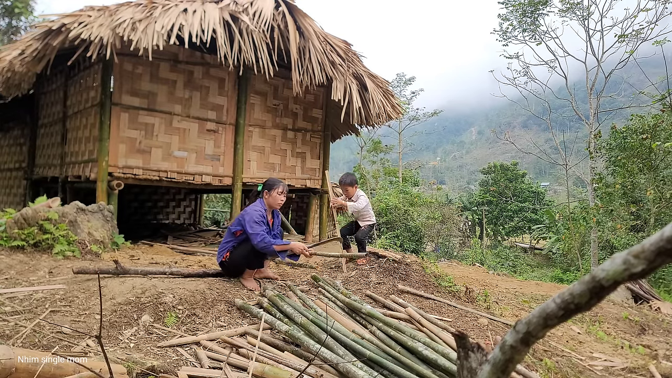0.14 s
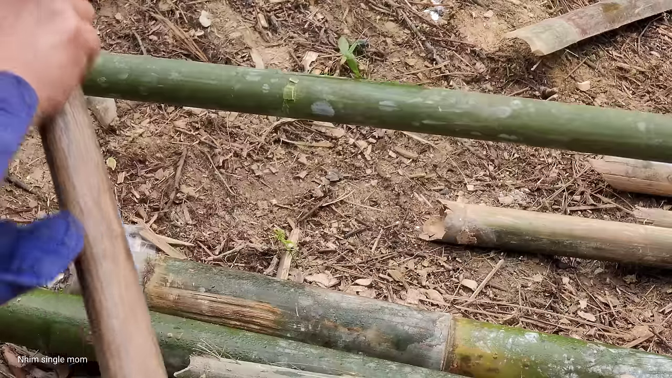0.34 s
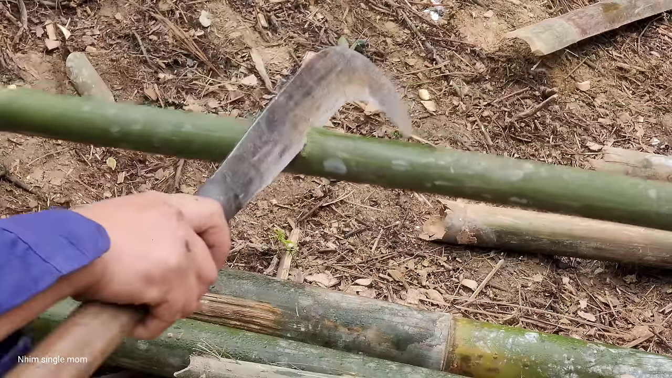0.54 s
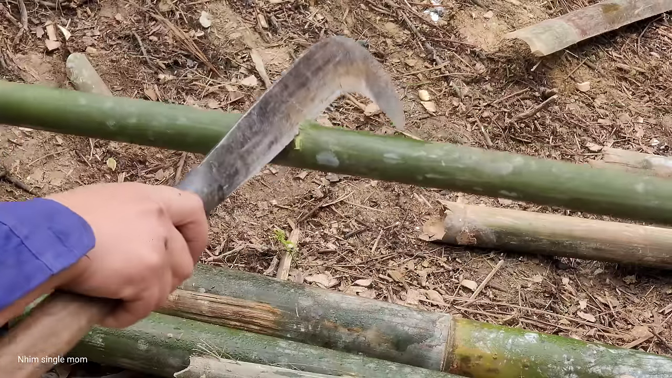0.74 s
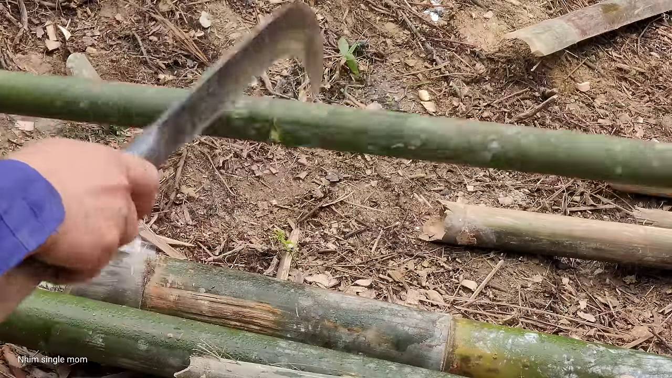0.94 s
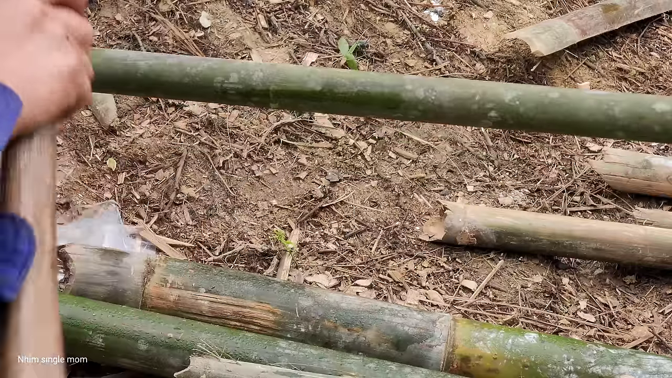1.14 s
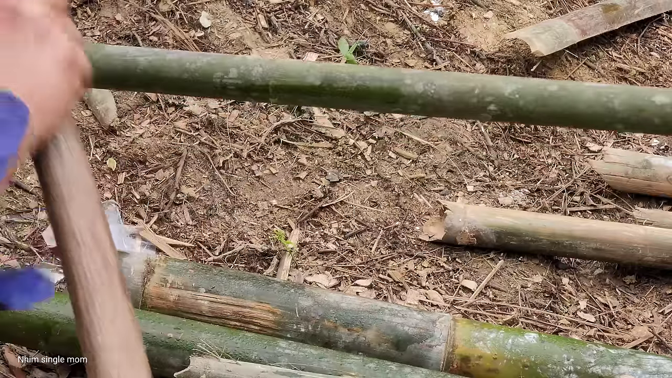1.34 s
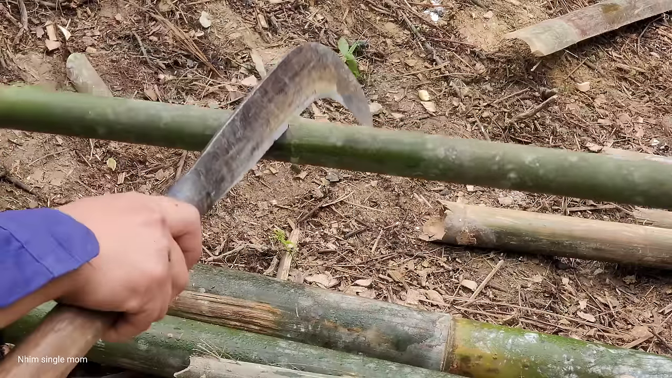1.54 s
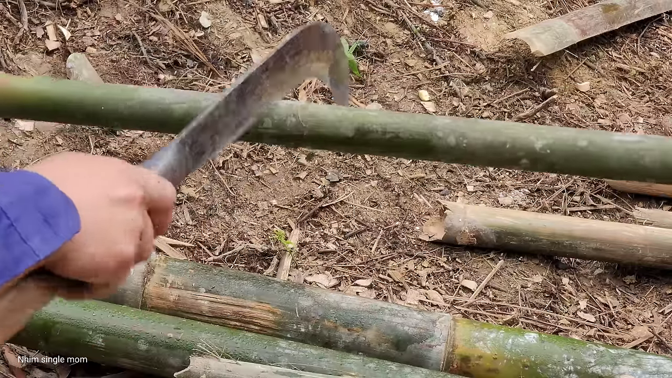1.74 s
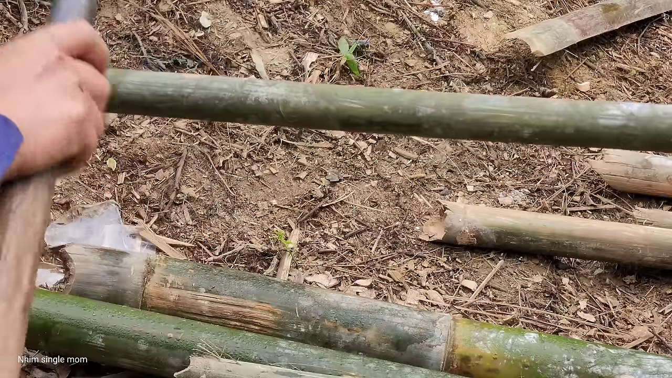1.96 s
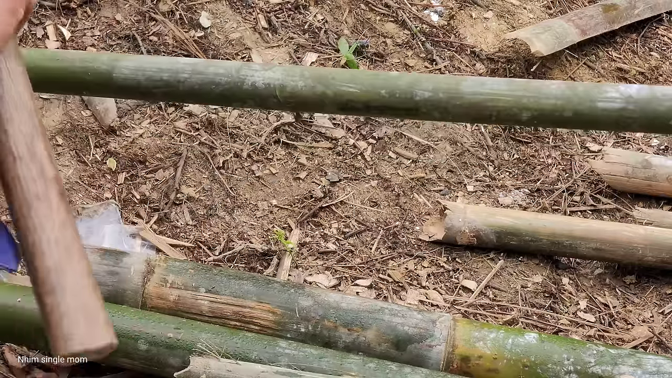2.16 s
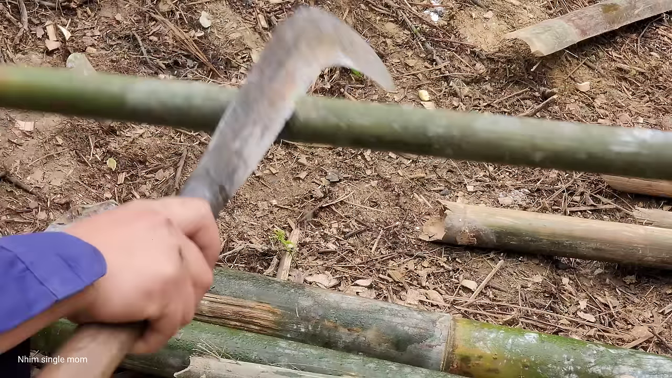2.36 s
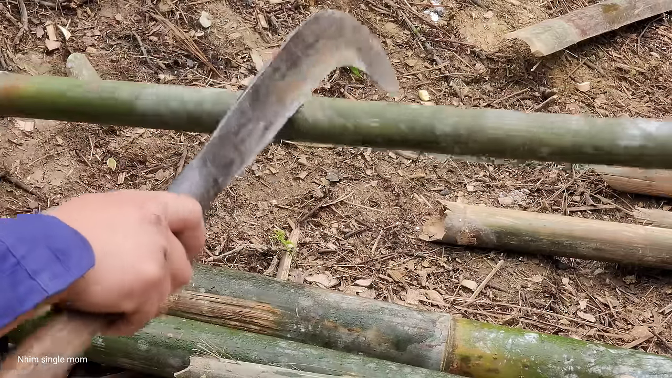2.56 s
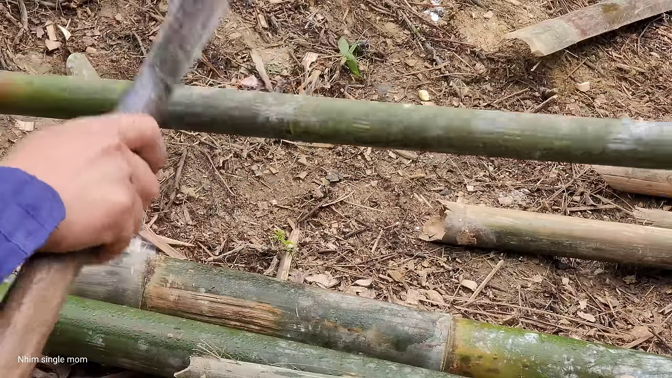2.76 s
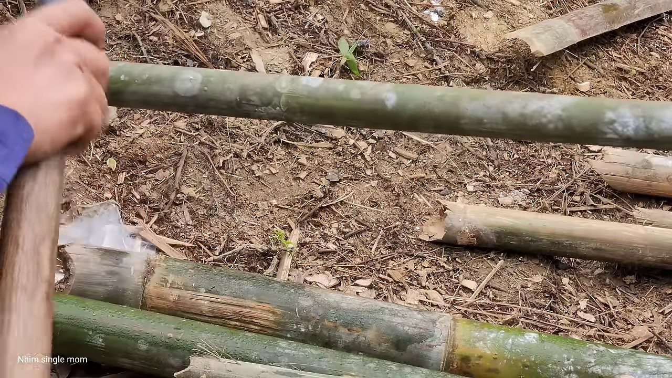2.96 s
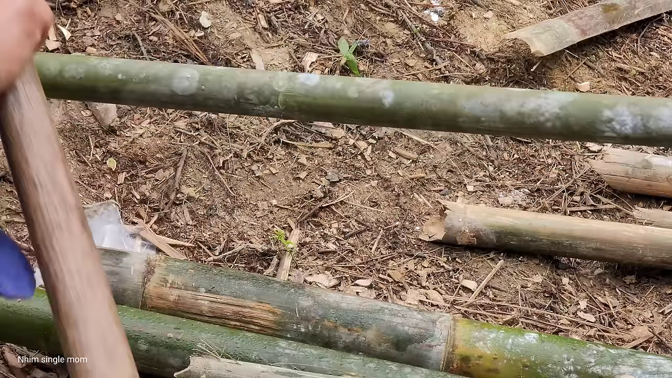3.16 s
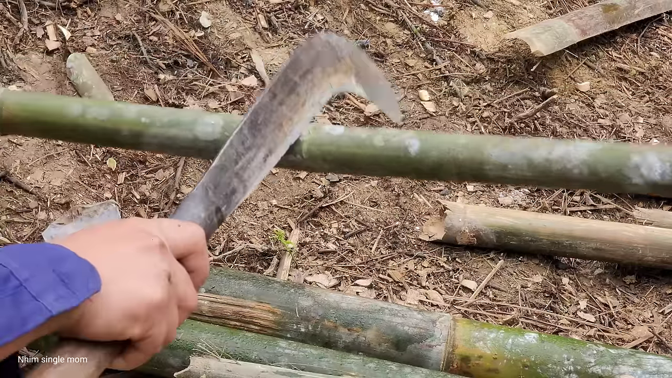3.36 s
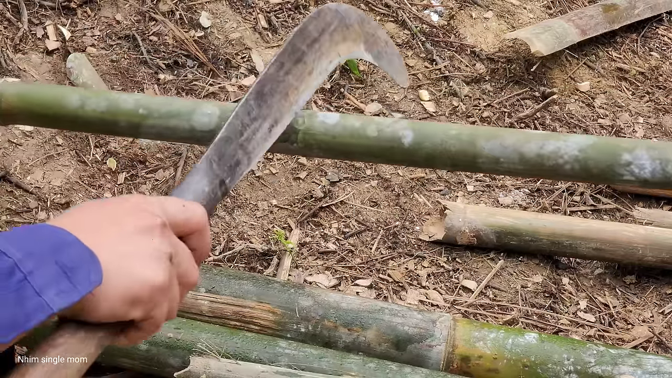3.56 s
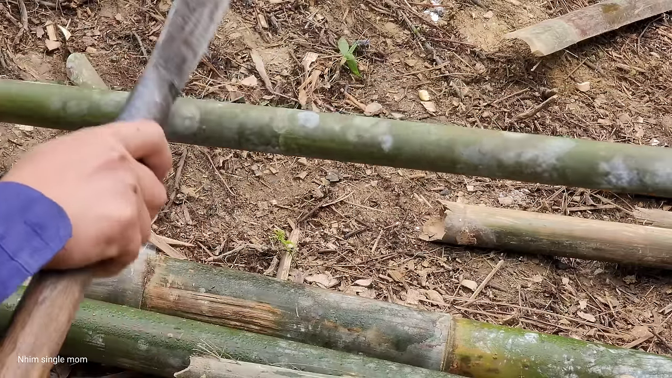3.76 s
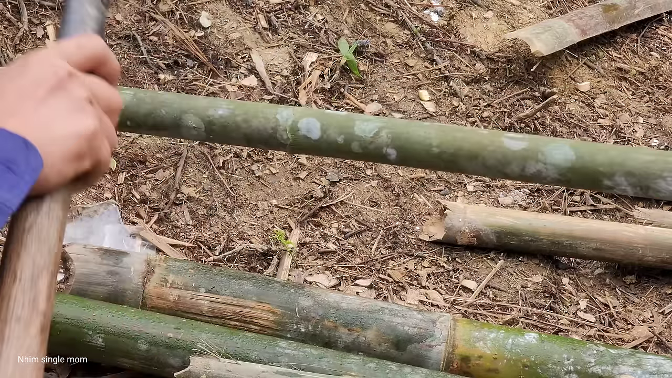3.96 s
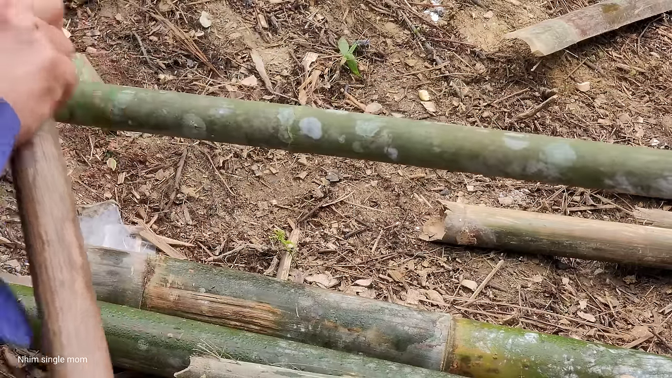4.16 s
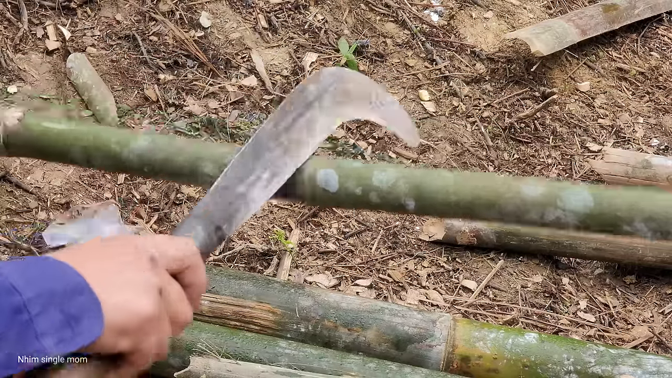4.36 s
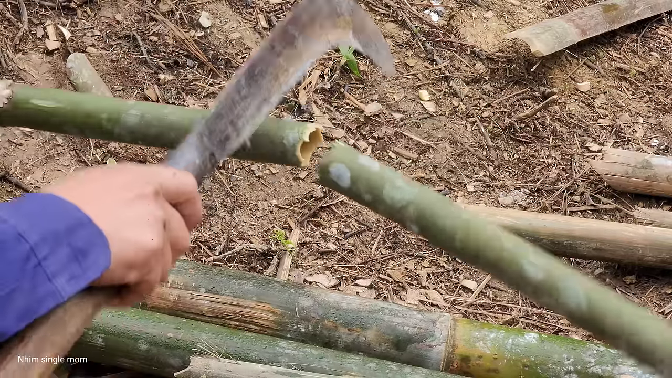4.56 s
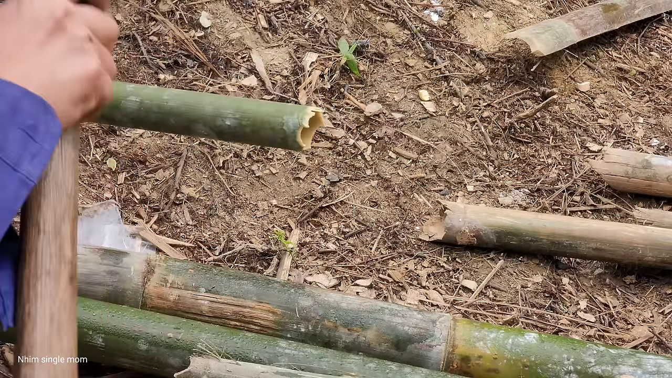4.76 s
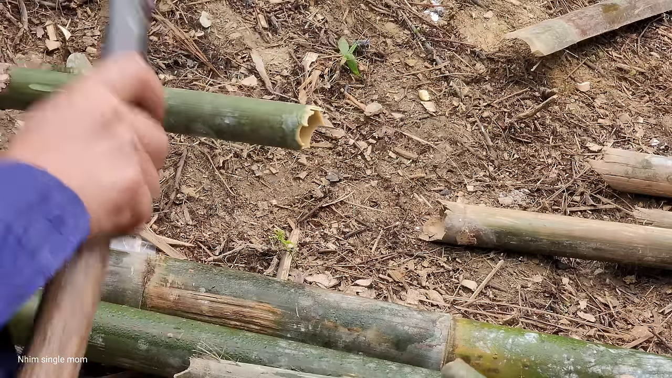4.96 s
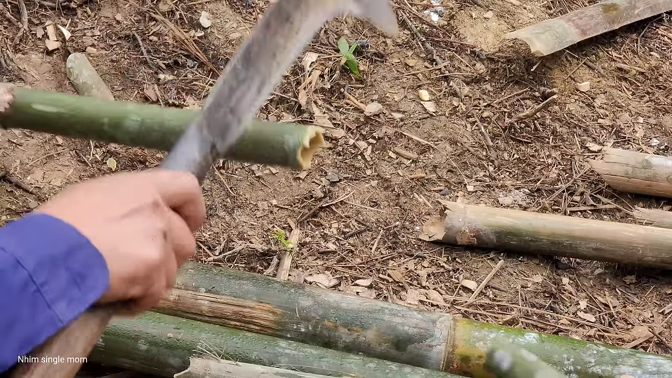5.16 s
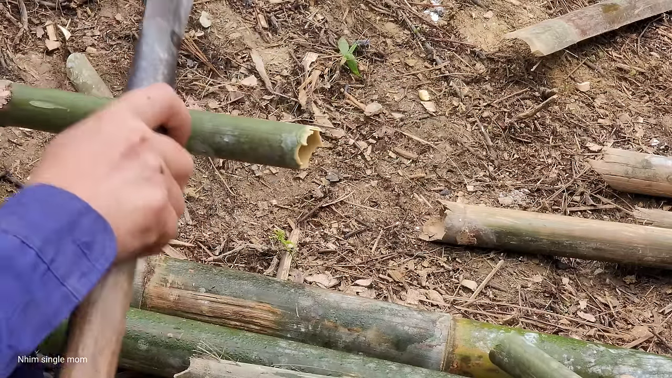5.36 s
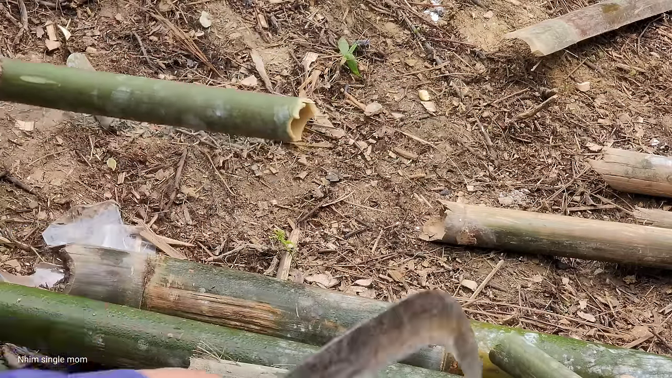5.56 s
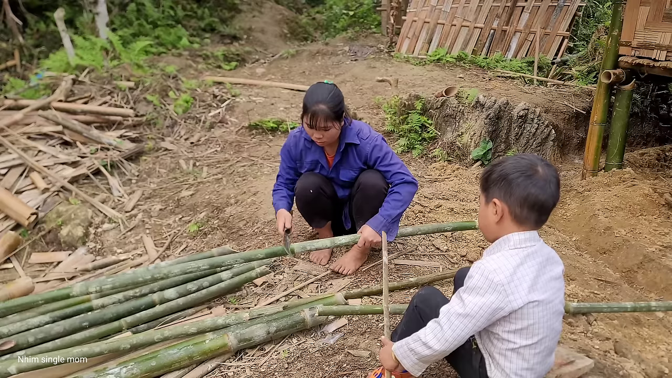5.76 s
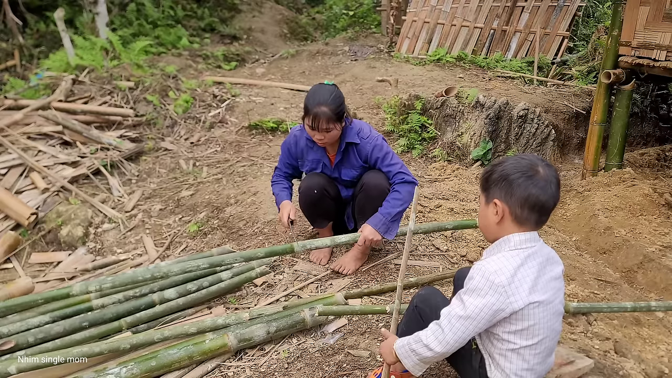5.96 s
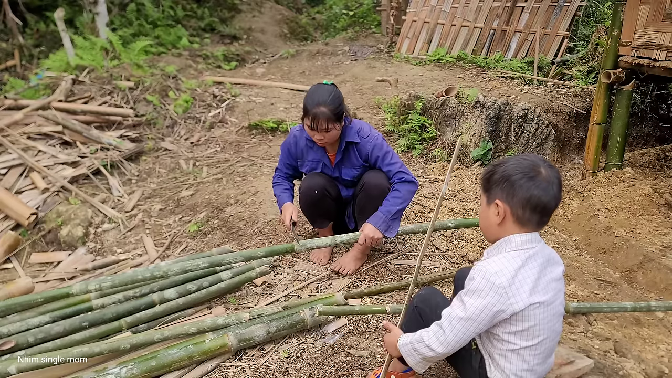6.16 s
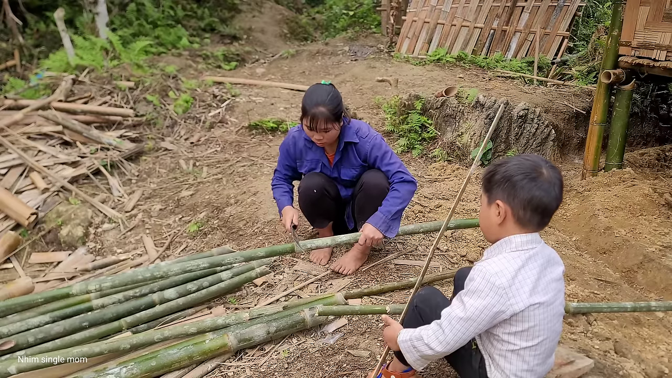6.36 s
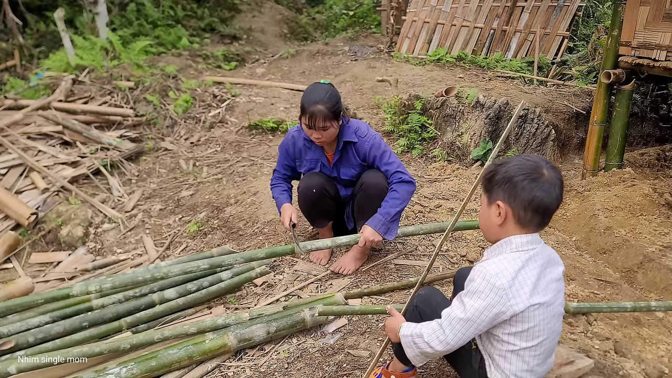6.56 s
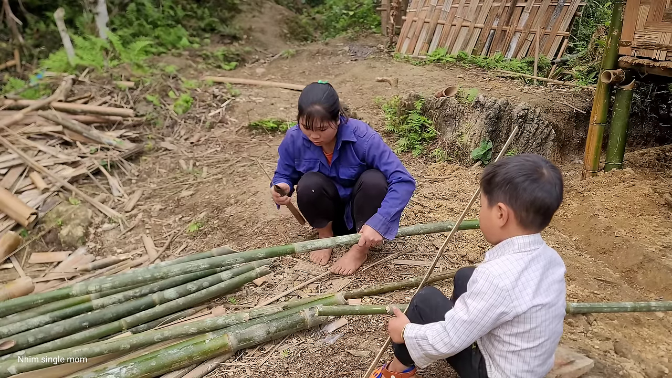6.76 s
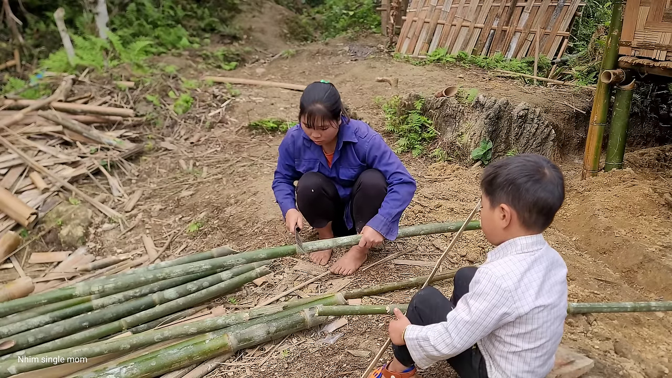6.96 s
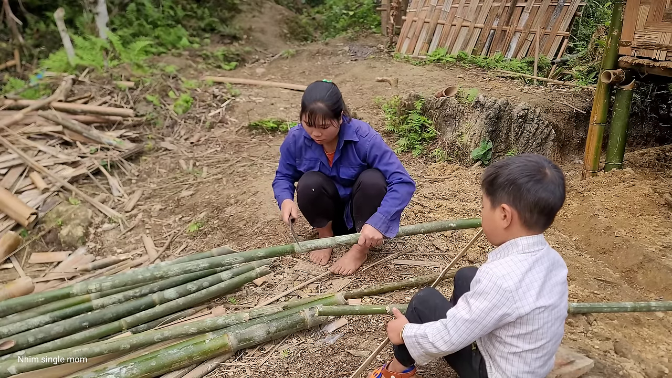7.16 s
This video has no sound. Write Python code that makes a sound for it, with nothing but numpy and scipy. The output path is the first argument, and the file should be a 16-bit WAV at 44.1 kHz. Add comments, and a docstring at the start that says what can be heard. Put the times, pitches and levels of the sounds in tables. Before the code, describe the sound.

A heavy hooked knife chops a hollow bamboo pole in sharp spaced blows, with splintering cracks, rattles and clattering pieces over a quiet rural hush.

```python
"""A hooked knife chops a green bamboo pole on dry litter, close to a phone; the pole bounces, rattles and snaps.
Each contact drives dense clicks through resonances of fibres, splinters, wall, tube and pole, plus one clean tap.
Behind: a hush of coloured noise with faint tones and hiss, a far rooster of two wavering partials,
small birds as gliding whistles and an insect as throbbing noise.
For the last part the phone stands further off, on the other side."""
import sys
import numpy as np
from scipy import signal
from scipy.fft import rfft, irfft
from scipy.io import wavfile
from scipy.ndimage import uniform_filter1d

SR = 44100
rng = np.random.default_rng(int(sys.argv[2]) if len(sys.argv) > 2 else 0)


def master(y):
    """Save y as 16-bit WAV."""
    cut = np.clip(np.atleast_2d(y).T, -1, 1)
    pcm = np.round(cut * 32767)  # scale
    wavfile.write(sys.argv[1], SR, pcm.astype(np.int16))


N = 317961
TIME = np.arange(N) / SR
CLOSE_UNTIL_S = 5.72


def undb(db):
    """dB to gain."""
    return 10 ** (np.asarray(db) / 20)


def unit(x):
    """Scale to rms 1."""
    return x / np.sqrt(np.mean(x ** 2))


def walk(rate_hz):
    """Random levels held 1 / rate_hz and slewed twice; spread near 1."""
    hold = int(SR / rate_hz)
    steps = np.repeat(rng.standard_normal(N // hold + 1), hold)
    slewed = uniform_filter1d(uniform_filter1d(steps, hold), hold)
    return 1.1 * slewed[:N]


def ring(x, modes):
    """Sum of resonances with alternating signs; modes as (frequency [Hz], width [Hz], level [dB])."""
    total = 0
    for k, (hz, width_hz, db) in enumerate(modes):
        b, a = signal.iirpeak(hz, hz / width_hz, SR)
        total = total + (-1) ** k * undb(db) * signal.lfilter(b, a, x)
    return total


def tones(modes, flicker_db):
    """Narrow noisy tones: stereo noise through each resonance twice, each swelling on its own."""
    total = 0
    for hz, width_hz, db in modes:
        resonance = [(hz, width_hz, 0)]
        level = undb(db + flicker_db * walk(35))
        noise = rng.standard_normal((2, N))
        total = total + level * unit(ring(ring(noise, resonance), resonance))
    return total


def coloured(spectrum):
    """Stereo noise of a given spectrum, rms 1; most alike in the bass, unrelated above."""
    hz = np.maximum(np.fft.rfftfreq(N, 1 / SR), 1)
    mid, side = rfft(rng.standard_normal((2, N)))
    points_hz, points_db = np.transpose(spectrum)
    apart = np.clip(hz / 210.0, .35, 1)
    gain = undb(np.interp(np.log(hz), np.log(points_hz), points_db))
    return unit(irfft(gain * np.array([mid + apart * side, mid - apart * side]), N))


# hush level: (time [s], level [dB])
HUSH_LEVEL = [(0, -48), (.2, -67.5), (.33, -70), (.5, -55.5), (1.2, -59), (5.5, -60.5), (5.75, -62.5),
              (6.5, -63), (7.21, -60)]
# hush spectra at the near and far place: (frequency [Hz], relative density [dB per Hz])
HUSH_SPECTRUM_CLOSE = [(15, -47.5), (25, -29.5), (64, -2), (87, -20.5), (145, -10), (277, -5), (354, -15),
                       (641, -12), (911, -16.5), (1260, -17.5), (4250, -23.5), (4740, -26), (5880, -34),
                       (16000, -69)]
HUSH_SPECTRUM_FAR = [(15, -41.5), (25, -4.5), (55, -1.5), (92, -13), (137, -3), (293, -9), (476, -14.5),
                     (624, -24), (936, -13), (1940, -26), (4490, -23.5), (5730, -32.5), (14800, -72),
                     (16000, -45.5)]
# wavering far tones on the close side: (frequency [Hz], width [Hz], level [dB])
DRONE_TONES = [(273, 21, -67.5), (1200, 360, -67), (1040, 140, -69), (6700, 1000, -86.5)]
# insect tones at the far place: (frequency [Hz], width [Hz], level [dB])
FAR_INSECT_TONES = [(4600, 300, -75), (3900, 350, -79.5), (980, 71, -83), (6400, 840, -93)]
FAR_INSECTS_FROM_S = 6.15
# faint treble hiss: (time [s], level [dB])
HISS_LEVEL = [(0, -82.5), (3.2, -85), (4.4, -78), (5.6, -79), (6.25, -75.5), (6.4, -80.5), (7.21, -77.5)]


def hush():
    """Air, leaves and the far valley as noise and narrow tones; the colour changes with the place of the phone."""
    close = TIME < CLOSE_UNTIL_S
    bed = np.where(close, coloured(HUSH_SPECTRUM_CLOSE), coloured(HUSH_SPECTRUM_FAR))
    bed = bed * undb(np.interp(TIME, *np.transpose(HUSH_LEVEL)) + 0.49 * walk(7.2))
    drone_fade = close * np.clip((TIME - .3) / .3, 0, 1)
    drone = drone_fade * tones(DRONE_TONES, 1.5)
    insect_fade = np.clip((TIME - FAR_INSECTS_FROM_S) / 0.13, 0, 1)
    insects = insect_fade * tones(FAR_INSECT_TONES, 0.92) * undb([[-2.5], [2.5]])
    highpass = signal.butter(6, 10200, "high", fs=SR, output="sos")
    hiss = signal.sosfilt(highpass, rng.standard_normal((2, N)))
    hiss_gain = undb(np.interp(TIME, *np.transpose(HISS_LEVEL)) + 2.5 * walk(12))
    return bed + drone + insects + hiss_gain * hiss


# far rooster: (time [s], pitch [Hz], level [dB], second partial re first [dB])
CROW_CONTOUR = [(.36, 607, -100, 15), (.42, 630, -71, 11), (.5, 627, -81, 6), (1.102, 638, -66, 1.5),
                (1.462, 644, -68.5, -9), (1.929, 599.5, -67.5, 5), (2.099, 567.4, -62.5, -11),
                (2.2, 505, -63, -6), (2.4, 486, -66.5, -5), (2.46, 506, -100, -2)]


def rooster():
    """A hoarse crow: two partials of one unsteady pitch, wavering on their way across the slope."""
    s, *contours = np.transpose(CROW_CONTOUR)
    hz, db, second_db = (np.interp(TIME, s, contour) for contour in contours)
    phase = 2 * np.pi * np.cumsum(hz * (1 + 0.02 * walk(43))) / SR
    # separate fading per partial and port
    first, second = (undb(1.3 * np.array([walk(20), walk(11)])) for _ in range(2))
    voice = first * np.sin(phase) + second * undb(second_db) * np.sin(2 * phase)
    crowing = (TIME >= s[0]) & (TIME <= s[-1])
    return undb(db) * voice * crowing


# small birds and far fowl:
# (time [s], length [s], start pitch [Hz], pitch approached [Hz], starting level [dB], left minus right [dB])
BIRD_CALLS = [(1.285, 0.064, 6940, 7140, -61, -15), (1.307, 0.11, 1040, 1020, -69.5, -1),
              (1.941, 0.17, 1242, 1200, -69.5, 9.5), (2.128, 0.035, 6300, 7220, -68, -25.5),
              (2.286, 0.043, 6080, 6700, -66, -13), (2.906, 0.069, 1290, 1286, -66, -13),
              (3.015, .05, 1140, 980, -70, -4.5), (3.002, 0.063, 1290, 1230, -60, 9.5),
              (3.01, 0.038, 4050, 3280, -69, -4), (3.042, .035, 2830, 2450, -61, 0),
              (3.093, 0.056, 2700, 2300, -65, 2), (3.051, 0.067, 1060, 1280, -57, -7),
              (3.235, .06, 2640, 2640, -75, -5.5), (3.249, 0.035, 2580, 2080, -61, -7),
              (3.275, .06, 2140, 2750, -63, -5), (3.225, 0.069, 3750, 4040, -68, -5),
              (3.282, .05, 3850, 3680, -73, -3), (3.774, 0.1, 6700, 6870, -69, -15),
              (4.082, 0.15, 5000, 4600, -58, -5), (5.857, 0.068, 6330, 6450, -59, -12)]
GLIDE_SHARE = 0.26  # glide time constant / call length


def birds():
    """Whistles and clucks with exponential pitch glides, scattered back by many trees as decaying noise."""
    out = np.zeros((2, N))
    ragged = undb(2.5 * walk(90))
    for s, length_s, start_hz, end_hz, db, pan_db in BIRD_CALLS:
        t = np.maximum(TIME - s, 0)
        glide_s = GLIDE_SHARE * length_s
        glide_cycles = (start_hz - end_hz) * glide_s * (1 - np.exp(-t / glide_s))
        phase = 2 * np.pi * (end_hz * t + glide_cycles)
        fades = np.clip(t / .012, 0, 1) * np.clip((length_s - t) / .012, 0, 1)
        shape = fades * undb(-14 * t / length_s) * ragged
        out += undb(db + np.array([[pan_db], [-pan_db]]) / 2) * shape * np.sin(phase)
    trees = rng.standard_normal((2, SR)) * undb(-41 - 60 * TIME[:SR] / .7)
    return out + signal.fftconvolve(out, trees, axes=1)[:, :N]


# insect trills: (time [s], length [s], level of the first throb [dB])
TRILLS = [(6.4, .21, -72), (6.893, .05, -68.5)]
# insect body: (frequency [Hz], width [Hz], level [dB])
INSECT_BODY = [(2990, 110, 6.5), (2700, 190, -2)]
THROB_HZ, THROB_GROWTH_DB = 25.2, 1.5


def insect():
    """Short rasping throbs of noise through a small resonant body, off to the right; each trill grows."""
    gate = np.zeros(N)
    for s, length_s, db in TRILLS:
        for k in range(int(length_s * THROB_HZ) + 1):
            centre_s = s + .008 + k / THROB_HZ
            gate += undb(db + THROB_GROWTH_DB * k) * np.exp(-((TIME - centre_s) / 0.012) ** 2)
    rasp = unit(ring(rng.standard_normal(N), INSECT_BODY))
    return gate * rasp * undb([[-3], [3]])


# knife blows, and the pole or cut piece landing on the ground and other poles:
# (time [s], fibre tearing [dB], hollow knock [dB], tearing t60 [ms], tap [dB], thud [dB], knock t60 [ms])
KNIFE_BLOWS = [(0.0359, -36.5, -35, 220, -25.5, -42.5, 230), (0.5107, -23, -28.5, 450, -16.5, -38, 280),
               (1.4845, -24.5, -26, 264, -17.5, -22.5, 43), (2.4011, -23.5, -33.5, 223, -19.5, -37, 280),
               (3.3654, -22, -28, 210, -25, -34.5, 210), (4.3529, -25.5, -27, 247, -30, -35, 146),
               (6.2685, -48, -45.5, 90, -34, -45.5, 136), (6.9714, -28, -27.5, 170, -18, -34.5, 200)]
LANDINGS = [(.72, -35.5, -32.5, 180, -25, -42.5, 210), (.901, -39.5, -37, 270, -29, -48, 270),
            (1.667, -40.5, -35.5, 350, -27.5, -47.5, 190), (2.13, -78, -72, 100, -49, -54, 360),
            (2.565, -37.5, -36, 180, -29, -45, 120), (2.7238, -63.5, -51, 310, -42, -55, 140),
            (3.559, -48, -43.5, 210, -44, -44, 170), (3.72, -65.5, -57, 830, -55, -52.5, 81),
            (4.702, -22.5, -23, 138, -20, -47, 127), (4.798, -22.5, -30.5, 177, -24, -36, 160),
            (5.1091, -29.5, -35, 43, -29, -41, 203), (5.2293, -51.5, -43.5, 210, -28, -44.5, 290),
            (5.5373, -46.5, -67, 99, -55.5, -52.5, 260)]
# single fibres giving way:
# (time [s], fibre tearing [dB], hollow knock [dB], tearing t60 [ms], fizz over fibres [dB])
FIBRE_CRACKS = [(0.055, -33, -46.5, 124, 3), (.144, -54, -72, 40, 12.5), (0.5882, -21, -40.5, 81, -3),
                (0.629, -31.5, -38, 56, 0), (0.6904, -32, -45, 82, -3), (0.9426, -33, -39, 48, 0.5),
                (1.1876, -64, -79, 40, 1), (1.494, -23.5, -26, 33, 6), (1.544, -22.5, -33, 64, 3.5),
                (1.641, -38.5, -63, 30, 5.5), (1.7073, -35.5, -42, 59, 4), (1.7714, -39.5, -44.5, 76, 4.5),
                (2.4093, -25.5, -28, 35, 4), (2.442, -31, -35, 35, 4), (2.4596, -25.5, -41, 69, 1),
                (2.6, -39, -37, 93, -0.5), (3.408, -24.5, -32, 110, 0), (3.481, -35.5, -51, 55, 4.5),
                (3.7378, -53, -51.5, 17, 4.5), (4.3614, -27, -26, 44, -2), (4.397, -28.5, -45, 43, 3),
                (4.746, -31, -37, 29, 7), (5.016, -49, -55, 42, 7), (5.176, -52, -55, 25, -5),
                (5.0435, -52, -56, 21, 0), (5.55, -53.5, -49.5, 26, 18.5), (6.0137, -63.5, -87, 37, 0),
                (6.8048, -67, -84, 45, 2.5), (7.033, -36, -48, 44, -17), (7.056, -37, -53, 41, 3)]
# loose pole shaking against blade and litter:
# (time [s], fibre tearing [dB], hollow knock [dB], tearing t60 [ms], thud [dB])
POLE_RATTLES = [(0.102, -43, -46, 130, -70), (0.529, -20, -25.5, 93, -54.5), (0.566, -24, -35.5, 150, -46),
                (0.647, -44, -40, 150, -58), (0.752, -38, -41, 110, -51), (0.8517, -54, -54, 120, -64),
                (1.0736, -63.5, -57, 200, -67), (1.597, -36, -37.5, 170, -50), (1.834, -56.5, -54, 65, -57),
                (2.428, -34.5, -28.5, 260, -55), (2.514, -43, -38.5, 260, -50),
                (2.746, -64, -50, 340, -55.5), (3.444, -35, -33.5, 190, -46), (3.5754, -39, -41.5, 87, -60),
                (3.6435, -60, -58, 280, -61.5), (4.392, -30, -32, 216, -46.5),
                (4.462, -37, -36, 160, -46.5), (4.493, -37, -35, 200, -46), (4.552, -61.5, -60, 1900, -64),
                (4.733, -30.5, -33, 370, -46), (4.8297, -33, -30.5, 175, -39),
                (4.886, -39.5, -40, 180, -48), (4.9597, -48, -50, 330, -53), (4.983, -40, -41.5, 110, -50),
                (5.1264, -42.5, -34.5, 92, -58), (5.295, -57, -49.5, 380, -52.5),
                (5.356, -61, -52.5, 79, -58), (5.5865, -76, -54, 380, -54), (6.999, -40.5, -47, 540, -37.5)]
# traits per kind: (rise [ms], snap over fibres [dB], jolt over thud [dB])
CHOP = (4.2, 7.4, -11)
BOUNCE = (3.9, 4, -15)
CRACK = (5.5, -2.5, -14.5)
RATTLE = (5.5, -9, -19.5)
CHOP_FIZZ_DB, BOUNCE_FIZZ_DB, RATTLE_FIZZ_DB = -4, -1, 1  # over the fibres
CRACK_TAP_DB, CRACK_THUD_DB, RATTLE_TAP_DB = 2, -14.5, -7  # over the knock
CRACK_KNOCK_T60_MS, RATTLE_KNOCK_T60_MS = 110, 190


def contacts():
    """All contacts as columns, each row filled up with the traits of its kind."""
    rows = [row + (CHOP_FIZZ_DB,) + CHOP for row in KNIFE_BLOWS]
    rows += [row + (BOUNCE_FIZZ_DB,) + BOUNCE for row in LANDINGS]
    for s, fibre_db, knock_db, t60_ms, fizz_db in FIBRE_CRACKS:
        tap_db, thud_db = knock_db + CRACK_TAP_DB, knock_db + CRACK_THUD_DB
        rows.append((s, fibre_db, knock_db, t60_ms, tap_db, thud_db, CRACK_KNOCK_T60_MS, fizz_db) + CRACK)
    for s, fibre_db, knock_db, t60_ms, thud_db in POLE_RATTLES:
        tap_db = knock_db + RATTLE_TAP_DB
        rows.append((s, fibre_db, knock_db, t60_ms, tap_db, thud_db, RATTLE_KNOCK_T60_MS, RATTLE_FIZZ_DB)
                    + RATTLE)
    return np.transpose(rows)


FAR_RISE_SHARE = .12


def rises(s, rise_ms):
    """Rise times as heard from either place; further off the contacts start more abruptly."""
    return rise_ms * np.where(s < CLOSE_UNTIL_S, 1, FAR_RISE_SHARE)


LAG_CLOSE_SAMPLES, LAG_FAR_SAMPLES = 9, -20  # left port behind right, at full share


def to_ports(x, share):
    """Left port: later when close, earlier when far; long waves bend round the phone and lag less."""
    close = np.roll(x, int(share * LAG_CLOSE_SAMPLES))
    far = np.roll(x, int(share * LAG_FAR_SAMPLES))
    return np.where(TIME < CLOSE_UNTIL_S, close, far)


# modes of air column, bending pole, hard outer wall, fibres and splinters:
# (frequency [Hz], width [Hz], level [dB])
TUBE_MODES = [(742, 85, 0), (850, 90, -6), (615, 90, -8), (490, 70, -13)]
POLE_MODES = [(181, 70, -1.5), (287, 94, -1), (392, 82, 1)]
WALL_MODES = [(904, 260, -1.5), (1173, 100, -1), (1230, 36, 0.5), (1413, 110, 1), (1609, 110, -1.5)]
FIBRE_MODES = [(1780, 200, -2), (2097, 140, 1), (2250, 160, 1.5), (2750, 540, -3.5), (3200, 250, -1),
               (3540, 290, -4), (4200, 530, -5), (4970, 450, -3), (5366, 600, -6.5)]
SPLINTER_MODES = [(6060, 1200, 0.5), (7150, 1300, 0.5), (8440, 130, 3), (8570, 760, -4), (10580, 1100, 0),
                  (11800, 720, 1), (13390, 1200, -1.5), (15880, 570, -10)]
# soil and hand jolting the phone: (frequency [Hz], width [Hz], level [dB])
GROUND_MODES = [(61.5, 50, -5.5), (112.2, 46, 0.5)]
TAP_AT = .8  # share of the rise
POLE_DB, WALL_TAP_DB = -9, -1.5  # over the tube
FAR_SNAP_DB = 5.5


def taps():
    """One short push rings tube, wall and pole freely and jolts the ground under the phone; a fibre snaps."""
    s, fibre_db, _, _, tap_db, thud_db, _, _, rise_ms, snap_db, jolt_db = contacts()
    s = s + TAP_AT * rises(s, rise_ms) / 1000
    at = (s * SR).astype(int)
    push, click = np.hanning(24), np.ones(1)

    def strike(modes, force, db):
        """Impulse per contact, convolved with the peak-normalised response to the force."""
        blow = np.zeros(N)
        blow[at] = undb(db)
        response = ring(np.pad(force, (0, SR // 4)), modes)
        return signal.fftconvolve(blow, response / np.abs(response).max())[:N]

    wall = [(hz, width_hz, db + WALL_TAP_DB) for hz, width_hz, db in WALL_MODES]
    wood = strike(TUBE_MODES + wall, push, tap_db) + strike(POLE_MODES, push, tap_db + POLE_DB)
    jolt = strike(GROUND_MODES, push, thud_db + jolt_db)
    far_db = FAR_SNAP_DB * (s > CLOSE_UNTIL_S)
    snap = strike(FIBRE_MODES + SPLINTER_MODES, click, fibre_db + snap_db + far_db)
    wood_ports = np.array([to_ports(wood, 0.27), wood])
    # the jolt rocks the phone, so the ports feel it unequally
    jolt_ports = jolt * np.array([[.4], [1.3]])
    # the phone body shades the snap on the left
    snap_ports = np.array([0.64 * to_ports(snap, 0.66), 1.1 * snap])
    return wood_ports + jolt_ports + snap_ports


def grains(spread_db, alike, lag_share):
    """Dense clicks of uneven, bounded spread; a share reaches both ports alike, the rest is scattered."""
    sizes = undb(spread_db * np.minimum(rng.exponential(size=(3, N)), 6))
    shared, left, right = rng.standard_normal((3, N)) * sizes
    common = np.array([to_ports(shared, lag_share), shared])
    return np.sqrt(alike) * common + np.sqrt(1 - alike) * np.array([left, right])


LITTER_T60_MS = 361


def swell(at_s, db, pan_db, rise_ms, t60_ms, tail_db):
    """Stereo strength of all events: each rises, dies away and leaves settling litter; powers add."""
    power = np.zeros((2, N))
    t_ms = np.arange(int(.7 * SR)) / SR * 1000
    for s, level_db, side_db, rise, t60 in zip(at_s, db, pan_db, rise_ms, t60_ms):
        rise = max(rise, .2)
        late_ms = np.maximum(t_ms - rise, 0)
        decay = undb(-60 * late_ms / max(t60, 5))
        litter = undb(tail_db - 60 * late_ms / LITTER_T60_MS)
        shape = np.minimum(t_ms / rise, 1) ** 2 * (decay + litter)
        start = int(s * SR)
        gain = undb(level_db + np.array([[side_db], [-side_db]]) / 2)
        power[:, start:start + len(t_ms)] += (gain * shape[:N - start]) ** 2
    return np.sqrt(power)


def struck(strength, modes, spread_db, alike, lag_share=1, uneven_db=1.5):
    """Event-shaped grains drive the modes; the contact wanders, so each mode is fed in its own fits."""
    force = grains(spread_db, alike, lag_share)
    rung = 0
    for k, mode in enumerate(modes):
        feed = strength * force * undb(uneven_db * walk(70))
        rung = rung + (-1) ** k * ring(feed, [mode])
    return rung / np.sqrt(np.mean(ring(force, modes) ** 2))


LITTER_DB = -16  # over the event
FIZZ_PER_DB, FIRM_DB = 0.27, -30  # softer tearing than a firm one is also duller
CLACK_SHARE = 0.88  # wall follows fibres by this share, knock by the rest
PAN_CLOSE_DB, PAN_FAR_DB = -5.5, -2  # left minus right, before each layer's share
FAR_FIZZ_DB, FAR_RING = -6, 1.5  # further off: less fizz, knock t60 times this


def chopping():
    """Tearing fibres, flying splinters, the clack of the wall, the hollow knock and the thud of the pole."""
    s, crackle_db, knock_db, crackle_ms, _, thud_db, knock_ms, fizz_db, rise_ms, _, _ = contacts()
    close = s < CLOSE_UNTIL_S
    rise_ms = rises(s, rise_ms)
    knock_ms = knock_ms * np.where(close, 1, FAR_RING)
    pan_db = np.where(close, PAN_CLOSE_DB, PAN_FAR_DB)
    softness_db = FIZZ_PER_DB * (crackle_db - FIRM_DB)
    fizz_db = crackle_db + fizz_db + softness_db + np.where(close, 0, FAR_FIZZ_DB)
    clack_db = knock_db + CLACK_SHARE * (crackle_db - knock_db)
    patchy = undb(1.1 * walk(160))  # fibres give way in quick fits
    # the phone body shades the treble more than the bass
    crackle = swell(s, crackle_db, 0.65 * pan_db, rise_ms, crackle_ms, LITTER_DB)
    fizz = swell(s, fizz_db, 1.3 * pan_db, rise_ms, 0.89 * crackle_ms, LITTER_DB - 6.0)
    clack = swell(s, clack_db, 0.21 * pan_db, rise_ms, 0.87 * knock_ms, LITTER_DB)
    knock = swell(s, knock_db, .15 * pan_db, rise_ms, knock_ms, LITTER_DB)
    thud = swell(s, thud_db, 0 * pan_db, 0.14 * rise_ms, 1.4 * knock_ms, LITTER_DB)
    fibres = struck(patchy * crackle, FIBRE_MODES, spread_db=2.8, alike=0.2)
    splinters = struck(patchy * fizz, SPLINTER_MODES, spread_db=2.2, alike=0.16)
    wall = struck(clack, WALL_MODES, spread_db=2.4, alike=0.59, lag_share=0.92)
    tube = struck(knock, TUBE_MODES, spread_db=4.2, alike=0.62, lag_share=0.74, uneven_db=0.57)
    pole = struck(thud, POLE_MODES, spread_db=3.2, alike=0.98, lag_share=0.19, uneven_db=3.0)
    return fibres + splinters + wall + tube + pole


def scene():
    """All sources at the two ports."""
    return hush() + rooster() + birds() + insect() + taps() + chopping()


TOP_HZ, EDGE_HZ = 15600, 16700


def record(dry):
    """A soft limit rounds the loudest peaks; the phone dulls the last treble and cuts the top."""
    soft = .95 * np.tanh(dry / .95)
    dull = signal.sosfilt(signal.ellip(4, .5, 26, TOP_HZ, fs=SR, output="sos"), soft)
    return signal.sosfilt(signal.ellip(10, .3, 80, EDGE_HZ, fs=SR, output="sos"), dull)


dry = scene()
out = record(dry)
master(out)
```